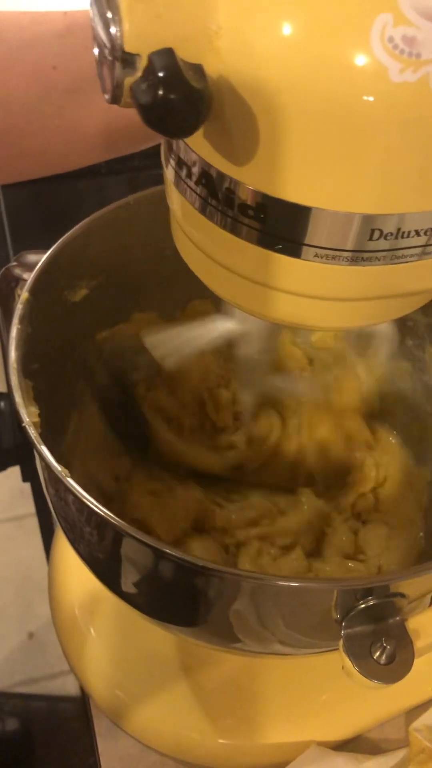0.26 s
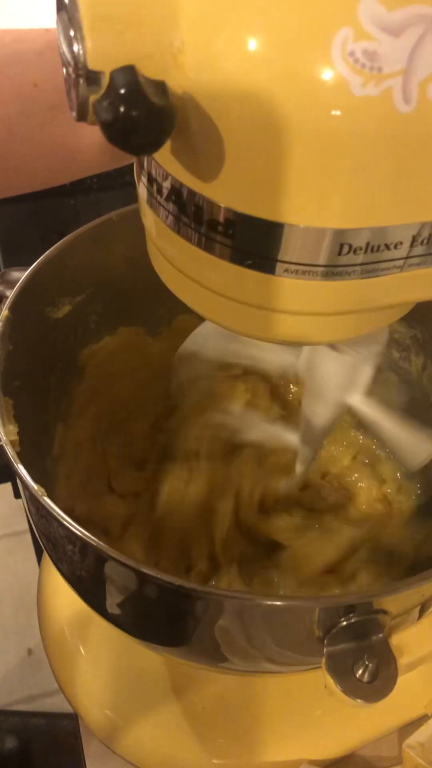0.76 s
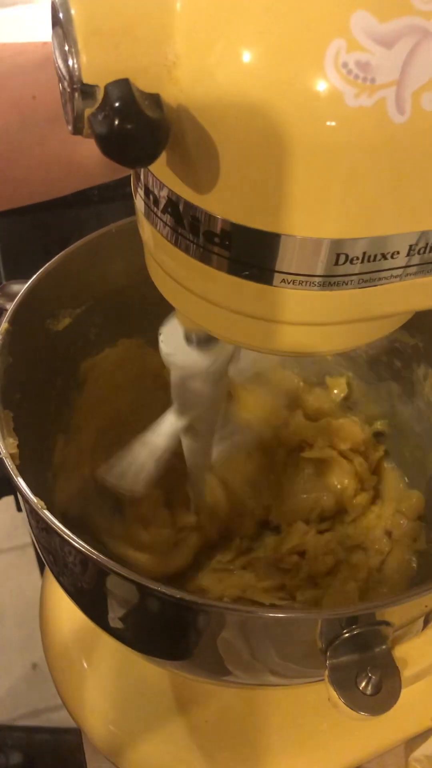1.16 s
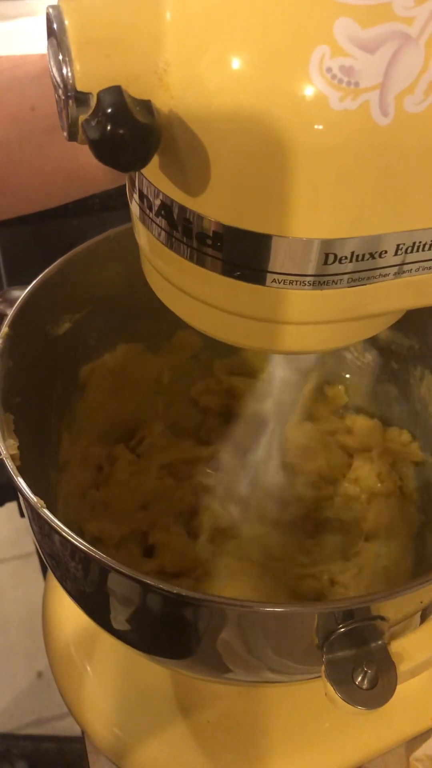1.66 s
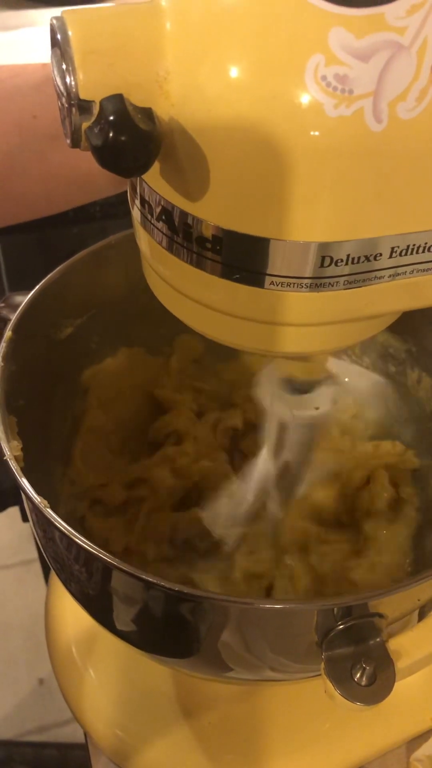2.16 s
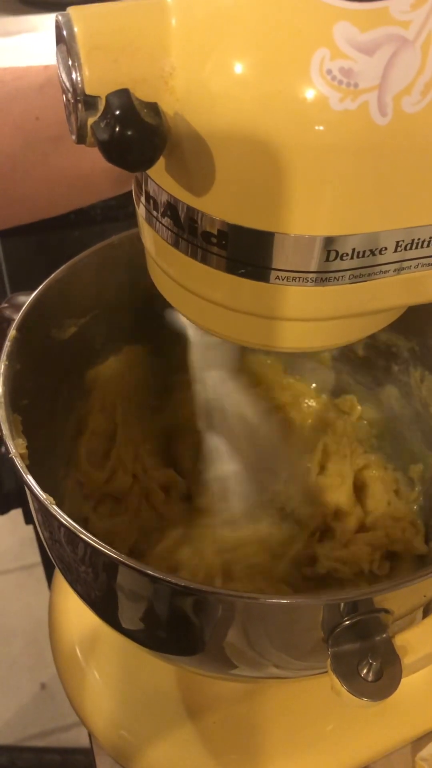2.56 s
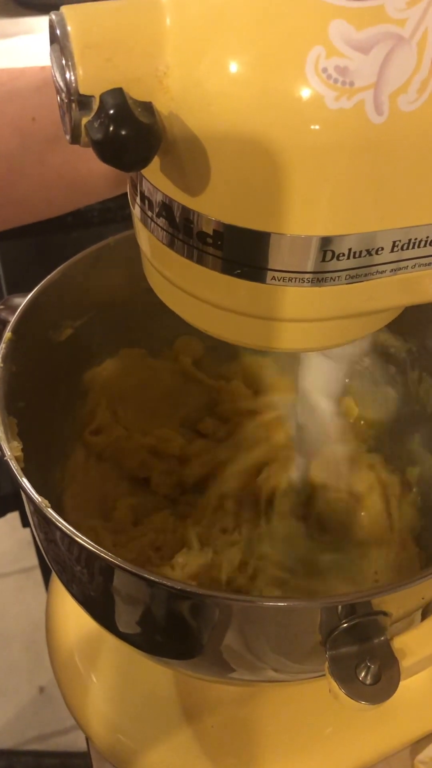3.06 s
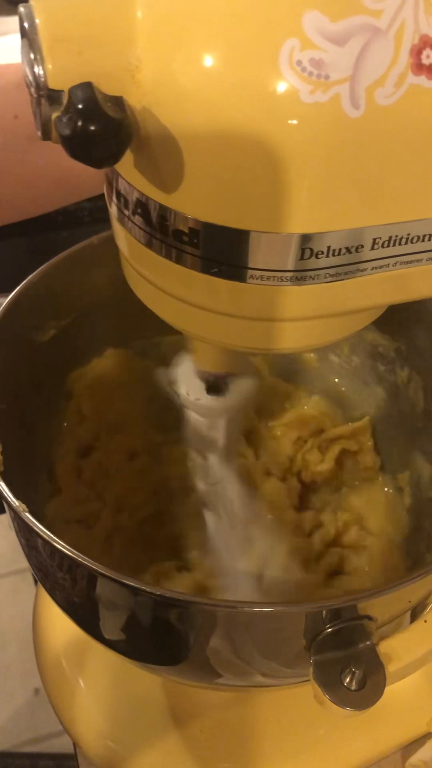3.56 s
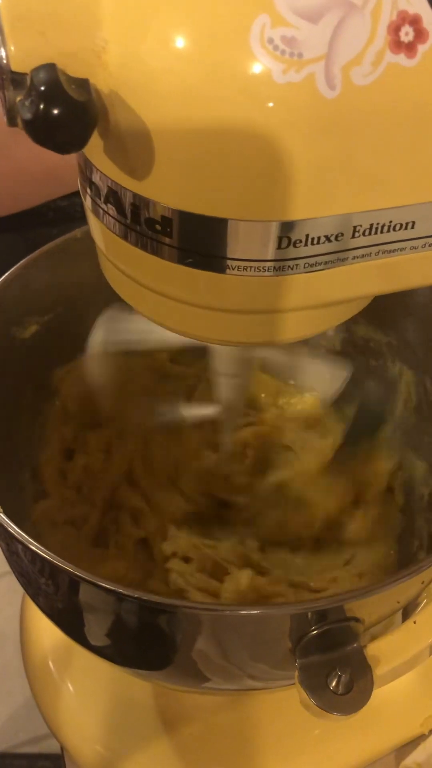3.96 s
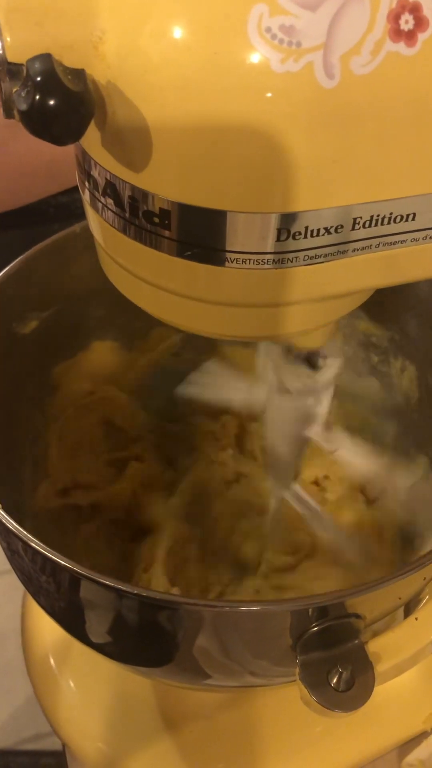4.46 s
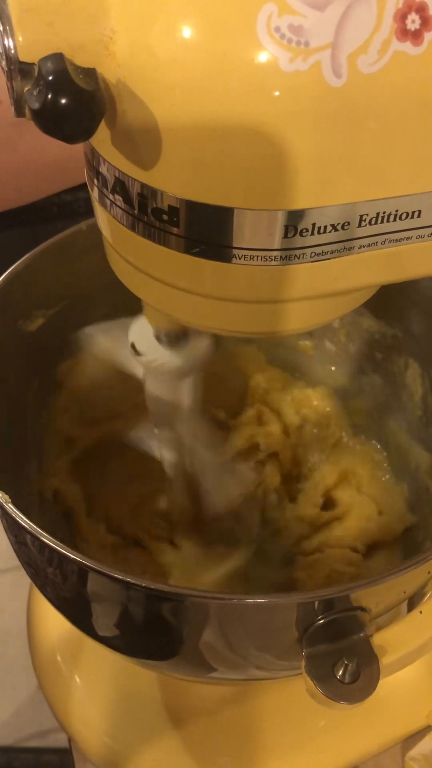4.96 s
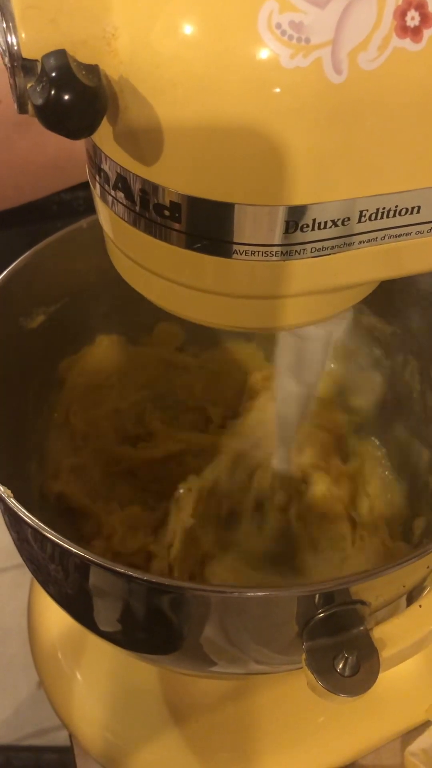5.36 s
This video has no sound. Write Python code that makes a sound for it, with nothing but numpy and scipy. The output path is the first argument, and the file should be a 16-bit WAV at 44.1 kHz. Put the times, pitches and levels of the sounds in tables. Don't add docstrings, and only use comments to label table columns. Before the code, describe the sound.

Close steady electric mixer whine, buzzy and slightly wavering under load, with hissing motor air and low casting rumble as dough stiffens.

```python
import sys
import numpy as np
from scipy import signal
from scipy.fft import rfft, irfft, next_fast_len
from scipy.io import wavfile
from scipy.ndimage import uniform_filter1d

SR = 44100
rng = np.random.default_rng(int(sys.argv[2]) if len(sys.argv) > 2 else 0)


def boost_factor(decibels):
    exponent = np.asarray(decibels, float) / 20
    return 10 ** exponent


def master(y):
    cut = np.clip(np.atleast_2d(y).T, -1, 1)
    pcm = np.round(cut * 32767)
    wavfile.write(sys.argv[1], SR, pcm.astype(np.int16))


N = 247401
SECONDS = np.arange(N) / SR

WHEEL = 1 / 12
ORBIT_HZ = 1.32
STIFFEN_DB_PER_S = 0.68
LUMP_S = 0.028

# (time [s], load [dB])
LUMPS = [(0.11, -3), (0.28, -2.5), (0.34, 1.53), (0.47, 1.34), (0.82, 2.5), (0.97, 1.72), (1.13, -3),
         (1.31, -2.5), (1.52, 3), (1.58, -2), (1.99, -3.5), (2.07, 1.6), (2.15, -2), (2.25, -2.5),
         (2.47, -1.8), (2.59, 2.3), (2.81, -2.5), (2.89, -1.82), (3.16, -1.58), (3.46, -1.74), (3.57, -2),
         (3.66, 5), (3.81, -4), (4.07, -1.42), (4.19, 2.5), (4.28, -2.0), (4.53, -1.6), (4.75, -1.8),
         (5.11, 2), (5.44, -3.5)]
# (frequency [Hz], width [Hz], level [dB])
CASTING = [(245, 40, 3), (470, 15, -6), (590, 20, 5), (615, 25, -4), (700, 60, 3), (860, 60, 2),
           (930, 50, -2), (1040, 50, 3), (1090, 30, -3), (1210, 50, -6), (1255, 25, 3), (1370, 40, 2),
           (1400, 25, -3), (1000, 25, -4), (1615, 25, 4), (1810, 40, -3), (2070, 90, -3), (2170, 30, -4)]


def gears(shaft):
    mesh = 5 * shaft
    wheel_angle = WHEEL * shaft

    whine = partial(mesh, rough=0.11, rate=34)
    # (wheel turns [count], level against the whine [dB])
    runout = [(-6, -31), (-3, -22), (-2, -25), (-1, -26), (1, -29), (3, -36)]
    for turns, db in runout:
        whine += boost_factor(db) * partial(mesh + turns * wheel_angle, rough=0.25, rate=6.06)
    octave = partial(2 * mesh, rough=0.3, rate=75)
    third = partial(3 * mesh, rough=0.45, rate=70)
    fourth = partial(4 * mesh, rough=0.55, rate=90)

    # (level [dB], swing in an orbit [dB], loudest at [s],
    # share of stiffening [ratio], swing in a wheel turn [dB], flutter [dB])
    contact = [
        (-25, 2.5, 0.35, 1.09, 0.5, 0.64),
        (-37.5, 0.9, 0.13, 0.93, 1, 0.9),
        (-50, 4.5, 0.34, .3, 0.3, 2.5),
        (-51.5, 4, 0.21, 1.67, 2.5, 1.5),
    ]
    wheel_swing = np.cos(wheel_angle - 3.3)
    teeth = np.zeros(N)
    for tone, row, moment in zip([whine, octave, third, fourth], contact, tooth_moments()):
        db, swing, loudest_s, share, turn, flutter = row
        level = db + swing * orbit(loudest_s) + share * stiffening_db() + moment
        level = level + turn * wheel_swing + flutter * wobble(30)
        teeth += boost_factor(level) * tone

    # (whine multiple [count], beater gear multiple [count], level [dB rms])
    beater = [(0, 1, -60), (1, -1, -54), (1, 1, -54), (2, -2, -55), (1, 2, -53), (1, 3, -53), (2, 2, -56),
              (4, -2, -53)]
    beater_angle = 1.3045 * shaft
    for j, k, db in beater:
        teeth += boost_factor(db) * partial(j * mesh + k * beater_angle, rough=0.3, rate=10)
    return teeth


def tooth_moments():
    # (time [s], level [dB])
    skips = [(.28, -4), (.89, -5), (1.01, -2), (1.33, -2), (1.48, -4), (1.565, -6), (1.8, -6), (3.05, -2),
             (3.44, -1.5), (4.92, -3.5), (5.03, -3.5), (5.16, -1), (5.3, -1)]
    # (time [s], level [dB])
    slack = [(0.04, -17), (0.12, -9), (0.23, -17), (0.44, -5.6), (0.68, -8), (0.77, -9), (1.0, -9),
             (1.06, 5), (1.28, 6), (1.37, -8), (1.69, 5), (1.97, -8.1), (2.29, -6.5), (2.63, -6),
             (2.72, -6.6), (2.98, -11), (3.26, -23), (3.47, -3.5), (3.62, -8), (3.82, -8), (3.94, 5.7),
             (4.06, -4.5), (4.27, -5), (4.35, 5), (4.55, -18), (4.85, -8), (4.95, -8), (5.04, -13),
             (5.23, -11), (5.48, -5.6)]
    # (time [s], third multiple [dB], fourth multiple [dB])
    chatter = [(0.03, 8.5, 5), (0.5, 5.5, 7), (0.88, 3.5, 2.8), (1.06, 1.4, 5.5), (1.15, 2, 5),
               (1.22, 7, -1), (1.3, -1.1, 5.1), (1.43, 2, 5.3), (1.53, 7.5, 6.5), (1.64, 0, 5),
               (2.48, 4, -6), (2.67, 2.1, 4), (3.11, 2.5, 5), (3.21, -3, 5), (3.34, 1.0, 6),
               (3.49, 4.5, 5.5), (3.63, 3, 6.9), (3.69, 10.5, 2.5), (3.89, 5, 5.5), (4.17, 4.5, 3),
               (4.42, 5, 8), (4.75, 5.5, 0.5), (5.05, 5.5, 2), (5.43, 3, 4.5)]
    blade_hz, first_pass_s = 7.54, 0.081
    wiping = 0.5 * np.cos(2 * np.pi * blade_hz * (SECONDS - first_pass_s))
    whine_db = bells(LUMPS, LUMP_S)[0] + bells(skips, 0.0079)[0] + wiping
    octave_db = bells(slack, 0.021)[0]
    third_db, fourth_db = 1.8 * np.array(bells(chatter, 0.03))
    return [whine_db, octave_db, third_db, fourth_db]


def motor(shaft):
    # (multiple of shaft speed [ratio], level [dB rms], roughness [0-1])
    rotor_tones = [(.5, -70, .2), (2.5, -47, .2), (9, -54, .3), (9.33, -52, .3), (9.5, -51, .2),
                   (12, -61, .2), (14, -55, .2), (14.5, -49, .2), (16, -55, .2), (17.5, -53, .3),
                   (22, -52, .2), (24, -47, .2), (25, -47, .4), (26, -41, .15), (29.5, -48, .3),
                   (30, -43, .2), (32, -40.5, .2), (33, -47.5, .3), (44, -50, .4), (46, -52, .3)]
    # (frequency [Hz], level [dB rms])
    mains = [(60, -69), (240, -57), (251, -61), (360, -47), (480, -59)]
    orders = sum(boost_factor(db) * partial(k * shaft, rough, rate=30) for k, db, rough in rotor_tones)
    hum = sum(boost_factor(db) * partial(2 * np.pi * hz * SECONDS, rough=0.4, rate=12) for hz, db in mains)
    return boost_factor(0.5) * orders + boost_factor(0.6) * hum


def hissing_air(shaft):
    # (frequency [Hz], level per Hz [dB])
    hiss = [(1500, -32), (2100, -19.5), (2500, -9.5), (3500, -9.5), (4750, -2.5), (6010, -2.5), (6800, -5),
            (7200, -8), (9000, -5), (10300, -7), (11300, -13), (12600, -10), (14000, -15), (15700, -16)]
    # (frequency [Hz], width [Hz], level [dB])
    walls = [(1950, 70, 6), (2260, 160, 5), (2560, 70, -5), (2830, 200, 4), (3070, 90, 4), (3310, 50, -3),
             (4090, 60, -3), (4590, 120, 2.5), (4730, 70, -3), (4970, 60, -6), (5130, 50, -4),
             (6030, 50, 3), (6220, 80, -3), (6860, 90, -3), (7070, 35, 5), (7460, 70, -4), (7580, 45, 4),
             (7850, 150, 3), (8180, 140, -3), (8340, 110, 5), (9250, 40, -4), (9520, 200, -4),
             (9770, 140, 4), (11550, 90, -3), (11810, 170, -4), (12960, 60, -3), (13210, 130, 5),
             (14810, 110, 5), (15700, 60, 1)]
    wheel_angle = WHEEL * shaft
    chop = 1 + 0.11 * np.cos(6 * shaft)
    chop += 0.041 * np.cos(wheel_angle) + 0.034 * np.cos(2 * wheel_angle)
    chop += 0.027 * np.cos(shaft / 2) + 0.029 * np.cos(shaft)

    def color(f):
        return boost_factor(along(hiss, f) + bumps_db(walls, f) + bumps_db(CASTING, f))

    air = filtered(chop * patchy(depth_db=1.18), color)
    fade_db = -35 - 60 * np.arange(900) / SR / 0.05
    echoes = rng.standard_normal(900) * boost_factor(fade_db)
    air = unit(air + signal.fftconvolve(air, echoes)[:N])
    return boost_factor(-26 + 0.38 * stiffening_db() + 0.17 * wobble(18)) * air


def vent_ring():
    # (frequency [Hz], width [Hz], level [dB])
    vents = [(6322, 55, -1), (6560, 190, 0)]

    def color(f):
        return np.sqrt(sum(boost_factor(2 * db) / (1 + (2 * (f - c) / w) ** 2) ** 2 for c, w, db in vents))

    ring = unit(filtered(patchy(depth_db=1.0), color))
    level = -35 + 0.5 * stiffening_db() + 0.5 * orbit(0.22) + 0.7 * wobble(5)
    return boost_factor(level) * ring


def bearing_rumble():
    # (frequency [Hz], level per Hz [dB])
    body = [(20, -64), (60, -24), (105, -30.5), (245, -14.5), (300, -19), (410, -7), (500, -21),
            (760, -9.5), (930, -18), (1040, -15), (1400, -9.5), (1820, -22), (2250, -10), (2600, -44)]
    rumble = filtered(patchy(depth_db=1.76), lambda f: boost_factor(along(body, f) + bumps_db(CASTING, f)))
    return boost_factor(-36.5) * unit(rumble)


def dough():
    # (time [s], level [dB])
    slaps = [
        (3.1535, 7.5),
    ]
    blows = np.zeros(N)
    for s, db in slaps:
        blows[round(s * SR)] = boost_factor(db)
    return filtered(blows, lambda f: 1 / (1 + ((f - 2800) / 1200) ** 4))


def stiffening_db():
    return STIFFEN_DB_PER_S * SECONDS


def orbit(peak_s):
    return np.cos(2 * np.pi * ORBIT_HZ * (SECONDS - peak_s))


def bells(table, width_s):
    s, *cols = np.transpose(table)
    t = np.arange(0, N + 64, 64) / SR
    shapes = np.exp(-0.5 * ((t - s[:, None]) / width_s) ** 2)
    return [np.interp(SECONDS, t, c @ shapes) for c in cols]


def partial(angle, rough, rate):
    angle = angle + 2 * np.pi * rng.random() + rough * wobble(rate)
    return unit((1 + rough * wobble(rate)) * np.cos(angle))


def wobble(rate):
    knots = rng.standard_normal(int(N * rate / SR) + 4)
    return np.interp(np.arange(N) * rate / SR, np.arange(len(knots)), knots)


def patchy(depth_db):
    z = signal.stft(rng.standard_normal(N), nperseg=512)[2]
    field = uniform_filter1d(rng.standard_normal(z.shape), size=6, axis=0)
    field = uniform_filter1d(field, size=16, axis=1)
    return signal.istft(z * boost_factor(depth_db * unit(field)), nperseg=512)[1][:N]


def filtered(x, response):
    m = next_fast_len(N + 8192)
    return irfft(rfft(x, m) * response(np.fft.rfftfreq(m, 1 / SR)), m)[..., :N]


def along(points, hz):
    f, v = np.transpose(points)
    return np.interp(np.log(hz + 1), np.log(f + 1), v)


def bumps_db(table, f):
    return sum(db / (1 + (2 * (f - c) / w) ** 2) for c, w, db in table)


def unit(x):
    return x / np.sqrt(np.mean(np.abs(x) ** 2) + 1e-20)


def scene():
    shaft_hz, sag_hz_per_db, orbit_sag_hz, slowest_s = 153.4, 0.45, 0.237, 0.14
    gear_hz = shaft_hz - sag_hz_per_db * bells(LUMPS, LUMP_S)[0] - orbit_sag_hz * orbit(slowest_s)
    rotor_hz = uniform_filter1d(gear_hz, size=SR // 10)
    gear, rotor = 2 * np.pi * np.cumsum([gear_hz, rotor_hz], axis=1) / SR
    mono = gears(gear) + motor(rotor) + hissing_air(rotor) + vent_ring() + bearing_rumble() + dough()
    return np.array([mono, mono])


def swap_bands(wide):
    # (time [s], bands swapped [count])
    swaps = [(.345, 1), (1.11, 2), (1.53, 2), (1.6, 2), (1.945, 1), (2.13, 1), (2.155, 1), (2.225, 2),
             (2.855, 2), (3.41, 1), (3.455, 2), (3.78, 2), (4.66, 2), (4.71, 1), (4.8, 2), (5.055, 1),
             (5.22, 2), (5.405, 1), (5.45, 1), (5.61, 1)]
    frame, frame_start = 1024, 738
    low_hz, high_hz, width_hz = 4300, 14000, 1600
    wide = np.pad(wide, ((0, 0), (0, 2 * frame)))
    rise = np.cumsum(np.kaiser(frame + 1, 4 * np.pi))
    rise = np.sqrt(rise[:-1] / rise[-1])
    window = np.r_[rise, rise[::-1]] * np.sqrt(2 / frame)
    n = np.arange(2 * frame) + (frame + 1) / 2
    times = [s for s, bands in swaps for _ in range(bands)]
    lows = rng.permutation(np.linspace(low_hz, high_hz, len(times)))
    for s, low in zip(times, lows):
        start = frame_start + frame * (round((s * SR - frame_start) / frame) - 1)
        first_bin = round(low * 2 * frame / SR)
        last_bin = round((low + width_hz) * 2 * frame / SR)
        bins = np.arange(first_bin, last_bin)
        basis = window * np.cos(np.pi / frame * np.outer(bins + 0.5, n))
        old = wide[:, start:start + 2 * frame] @ basis.T
        new = np.sqrt(np.mean(old ** 2)) * rng.standard_normal(old.shape)
        wide[:, start:start + 2 * frame] += (new - old) @ basis
    return wide[:, :N]


def low_pass(x):
    return signal.sosfilt(signal.butter(12, 16990, fs=SR, output="sos"), x)


def record(dry):
    wide = filtered(dry, lambda f: f < 15745)
    mix = swap_bands(wide)
    return low_pass(mix)


dry = scene()
out = record(dry)
master(out)
```